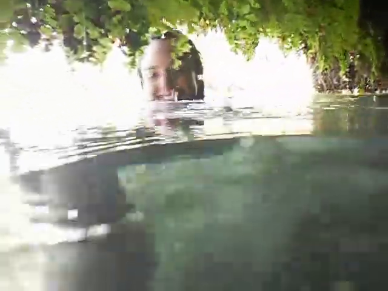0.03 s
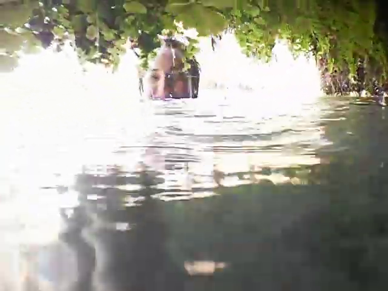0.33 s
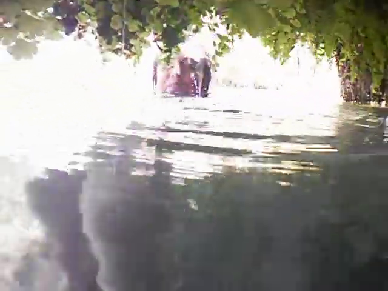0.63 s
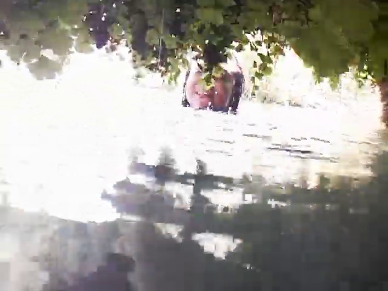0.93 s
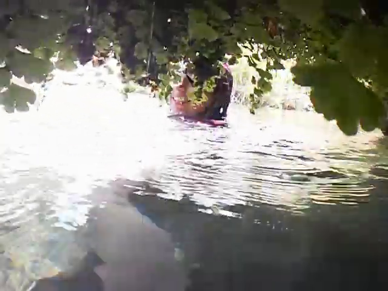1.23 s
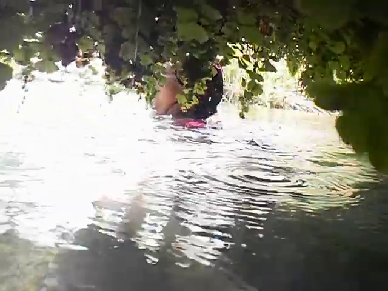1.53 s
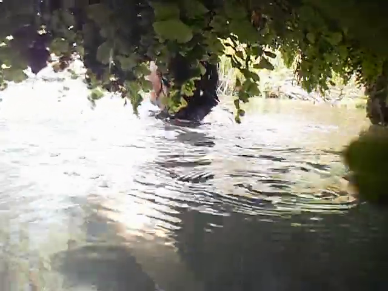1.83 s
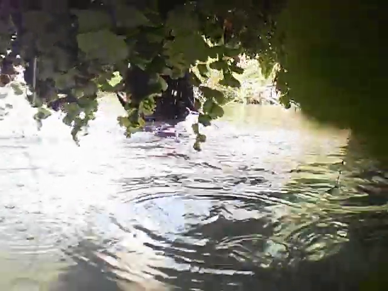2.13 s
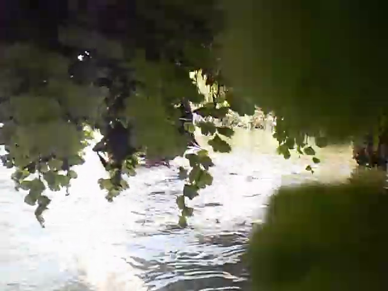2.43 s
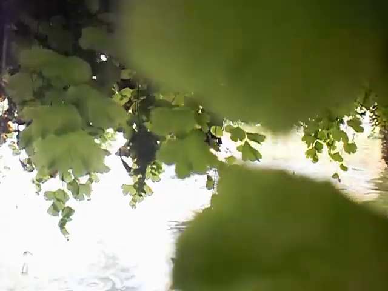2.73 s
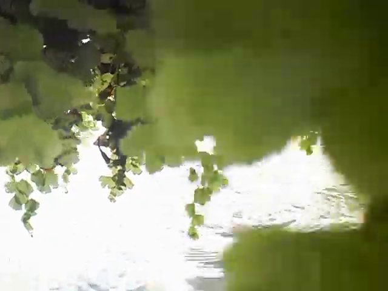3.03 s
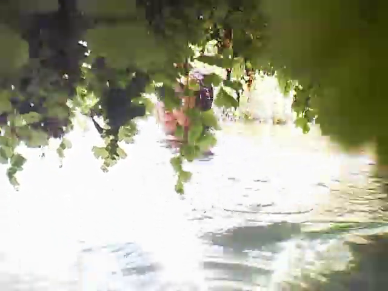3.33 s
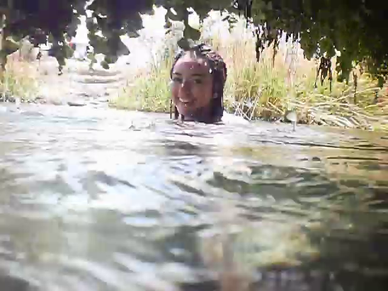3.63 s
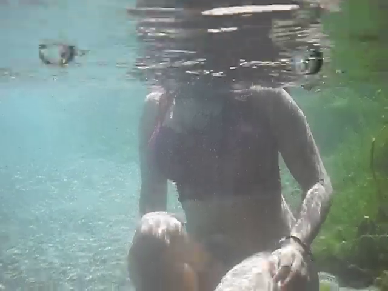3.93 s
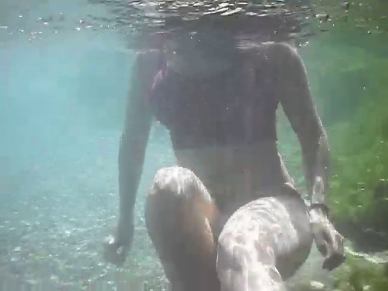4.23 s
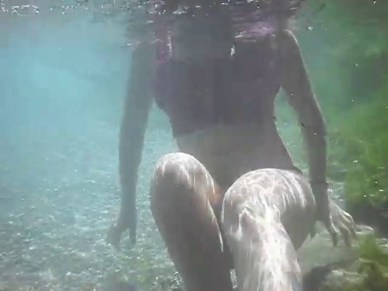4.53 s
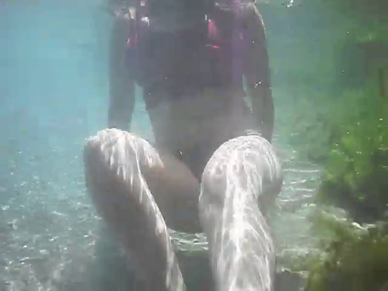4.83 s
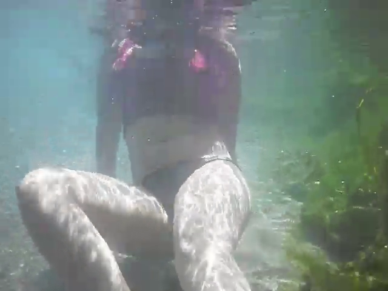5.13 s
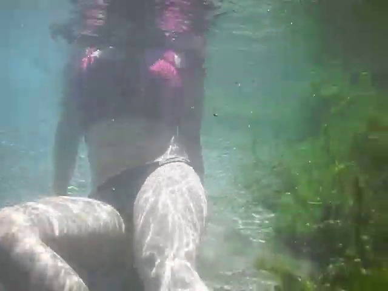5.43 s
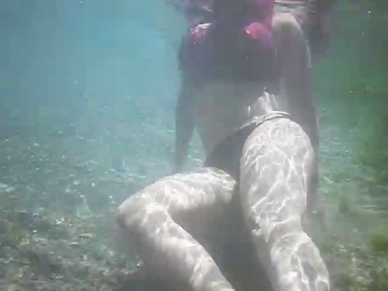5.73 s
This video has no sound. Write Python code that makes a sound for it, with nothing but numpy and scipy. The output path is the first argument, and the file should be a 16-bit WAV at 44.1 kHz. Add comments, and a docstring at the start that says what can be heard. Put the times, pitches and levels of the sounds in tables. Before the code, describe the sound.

A stream rushes softly with faint drips, then water slaps and gulps as the microphone goes under, followed by muffled glugging.

```python
"""A softly rushing stream, heard at water level from a waterproof camera afloat under dripping leaves.
At about 3.6 s the camera is dipped under. Water slaps its case, trapped air breaks away in a few big
gulps, and the rest escapes in a slowing train of glugs, all right beside the microphone.
The sealed case muffles everything and rings faintly."""
import sys
import numpy as np
from scipy.fft import rfft, irfft, next_fast_len
from scipy.io import wavfile
from scipy.ndimage import map_coordinates

SR = 44100
rng = np.random.default_rng(int(sys.argv[2]) if len(sys.argv) > 2 else 0)


def bounce(signal):
    """Save signal as a 16-bit WAV file at the path given by the first command-line argument."""
    frames = np.transpose(np.atleast_2d(signal))
    limited = np.clip(frames, -1, 1)
    pcm = np.round(limited * 32767).astype(np.int16)
    wavfile.write(sys.argv[1], SR, pcm)


N = 254456
TIME = np.arange(N) / SR
AGE = np.arange(SR // 3) / SR  # seconds into one short sound
TOP_HZ = 16500
SUNK_S, PLUNGE_S = 3.82, 3.87  # the case goes under; water closes round it
SUBMERGED = (TIME > SUNK_S).astype(float)


def amp(db):
    """Decibels to gain."""
    return 10 ** (np.asarray(db) / 20)


def unit_rms(x):
    """Scale to rms 1."""
    return x / np.sqrt(np.mean(x ** 2) + 1e-20)


def unit_peak(x):
    """Scale to peak 1."""
    return x / np.max(np.abs(x))


def gain_at(spectrum, hz):
    """Gain at hz, between (freq_hz, level_db) points on a log frequency axis."""
    freq_hz, level_db = np.transpose(spectrum)
    return amp(np.interp(np.log(hz + 1), np.log(freq_hz + 1), level_db))


def wobble(rate):
    """A smooth random curve, rate knots a second."""
    return map_coordinates(rng.standard_normal(int(N * rate / SR) + 4), [TIME * rate])


def filtered(x, response):
    """x through a complex frequency response."""
    size = next_fast_len(len(x) + SR // 4)
    return irfft(rfft(x, size) * response(np.fft.rfftfreq(size, 1 / SR)), size)[:len(x)]


def resonate(x, modes):
    """x through (centre_hz, width_hz, level_db) resonances of alternating sign."""
    def response(f):
        return sum((-1) ** k * amp(db) * 1j * f * width / (centre ** 2 - f ** 2 + 1j * f * width)
                   for k, (centre, width, db) in enumerate(modes))
    return filtered(x, response)


def noise(spectrum, lo=0, hi=TOP_HZ):
    """Coloured noise of rms 1 between two frequencies."""
    white = rng.standard_normal(N)
    return unit_rms(filtered(white, lambda hz: gain_at(spectrum, hz) * (hz >= lo) * (hz < hi)))


def add(track, start_s, sound):
    """Mix a sound into the track."""
    part = track[max(round(start_s * SR), 0):][:len(sound)]
    part += sound[:len(part)]


def fade(t60, attack):
    """A quick swell and an exponential decay, both timed in seconds."""
    return (1 - np.exp(-(AGE / attack) ** 2)) * amp(-60 * AGE / t60)


def ring(hz, t60, attack, rise=0):
    """A dying tone; with rise, its pitch climbs through hz like a bubble rounding off."""
    settle_s = 0.012
    pitch = hz * (1 + rise * (.5 - np.exp(-AGE / settle_s)))
    return unit_peak(fade(t60, attack)) * np.sin(2 * np.pi * np.cumsum(pitch) / SR)


def spit(modes, t60, attack):
    """A short burst of resonant noise, peak 1."""
    return unit_peak(resonate(rng.standard_normal(len(AGE)) * fade(t60, attack), modes))


def drips(centre_hz, spread, t60, size_db, count):
    """Many tiny pings of scattered time, pitch and size, rms 1."""
    out = np.zeros(N)
    age = AGE[:SR // 30]
    shape = fade(t60, attack=0.00025)[:len(age)]
    starts = rng.uniform(0, N / SR, count)
    pitches = centre_hz * np.exp(spread * rng.standard_normal(count))
    sizes = np.minimum(rng.exponential(1, count), 2)
    for start_s, hz, size in zip(starts, pitches, sizes):
        add(out, start_s, amp(size_db * size) * shape * np.sin(2 * np.pi * hz * age))
    return unit_rms(out)


# Body of the stream, from water level: freq_hz, relative_db
RUSH_SPECTRUM = [(12, -31), (20, 7), (27, -8.5), (103, -4.5), (170, -5), (231, -7), (436, -10), (509, -11),
                 (809, -12), (1060, -14.5), (2000, -15.5), (2600, -44), (4400, -120)]
# Its hiss, from the same spot: freq_hz, relative_db
SPRAY_SPECTRUM = [(1800, 3.5), (2300, 3.5), (2700, 0), (3400, 2.5), (3750, 0), (4100, -8.5), (4600, -11)]
def stream():
    """Water rushes evenly all round the floating camera; only its low end swells a little."""
    rumble_db = -49.5 + 0.7 * TIME + .8 * wobble(9)
    rumble = amp(rumble_db) * noise(RUSH_SPECTRUM, hi=250)
    rush = noise(RUSH_SPECTRUM, lo=250, hi=1800)
    spray = noise(SPRAY_SPECTRUM, lo=1800)
    babble_db = -46.2 + 0.22 * wobble(2.3)
    low_pings = amp(-8.5) * drips(700, spread=.4, t60=0.031, size_db=1.5, count=600)
    high_pings = amp(-5.5) * drips(2900, spread=.15, t60=0.0098, size_db=1.5, count=1200)
    babble = amp(babble_db) * unit_rms(rush + low_pings)
    hiss = amp(-48.5) * unit_rms(spray + high_pings)
    return rumble + babble + hiss


# The camera drifts in under dripping leaves: time_s, level_db
TRICKLE_LEVELS = [(.6, -61.5), (1.3, -54), (3.55, -53)]
def trickle():
    """Fine drips from the leaves ring on the water, all near one pitch."""
    level_db = np.interp(TIME, *np.transpose(TRICKLE_LEVELS))
    return amp(level_db) * drips(2330, spread=.03, t60=.03, size_db=3, count=1500)


# The drops that land nearest the microphone: start_s, level_db
NEAR_DROPS = [(1.4413, -34), (2.4144, -36.5), (2.7004, -38.5), (3.2974, -36)]
def drops():
    """Single drops from the leaves ping on the surface, each a short rising tone."""
    out = np.zeros(N)
    for start_s, level_db in NEAR_DROPS:
        pitch_hz = 2340 * (1 + rng.normal(0, 0.012))
        add(out, start_s, amp(level_db) * ring(pitch_hz, t60=0.037, attack=.00048, rise=.024))
    return out


# Bumps directly on the case: start_s, level_db
CASE_BUMPS = [(2.701, -27.5), (3.623, -25.5), (3.69, -20), (3.871, -19), (3.937, -16), (4.046, -22),
              (4.281, -30)]
def thumps():
    """A dull bump on the case dies within a few cycles."""
    out = np.zeros(N)
    for start_s, level_db in CASE_BUMPS:
        add(out, start_s, amp(level_db) * ring(hz=179.4, t60=0.032, attack=0.00046))
    return out


def surge(peak_s, fall_db_per_s):
    """Gain of a push of water that rises quickly and ebbs away."""
    rise_s = 0.022
    since_peak = TIME - peak_s
    return np.clip(1 + since_peak / rise_s, 0, 1) * amp(-fall_db_per_s * np.maximum(since_peak, 0))


# Pushes of water close round the case: peak_s, level_db, fall_db_per_s
WATER_SURGES = [(3.61, -31.5, 172), (3.87, -36, 53), (4.68, -41, 9.5)]
# Resonances of that churning water: centre_hz, width_hz, relative_db
CHURN_MODES = [(169.2, 24, 6.5), (268, 48, 4), (470, 70, 1), (620, 31, -9.5)]
def churn():
    """Water churns round the trapped air with each surge."""
    stir = sum(amp(level_db) * surge(peak_s, fall) for peak_s, level_db, fall in WATER_SURGES)
    flutter = amp(1.7 * wobble(24))
    return stir * flutter * unit_rms(resonate(rng.standard_normal(N), CHURN_MODES))


# Air trapped against the case: pitch_hz, relative_db, t60_s
CAVITY_MODES = [(272.5, -9, 0.094), (502.3, 2.5, 0.047), (767, -3.5, 0.088)]
def cavity():
    """The trapped air rings a little differently at each push."""
    return sum(amp(db + rng.normal(0, 0.73)) * ring(hz * (1 + rng.normal(0, 0.025)), t60, attack=.0008)
               for hz, db, t60 in CAVITY_MODES)


# Air breaking away beside the microphone: start_s, level_db, pitch_hz, t60_s, cavity_relative_db
AIR_POCKETS = [(3.608, -17.5, 337, 0.25, -19), (3.679, -14.5, 801, 0.056, -8),
               (3.69, -22.5, 276, 0.17, -1.5), (3.81, -25, 790, .047, -9), (3.872, -23.5, 735, .08, -8),
               (3.897, -23, 659, 0.09, -13), (3.926, -18.5, 251, 0.081, -12),
               (3.941, -21.5, 597, .055, -16), (4.004, -29, 550, 0.12, -15.5),
               (4.045, -19.5, 552, .05, -14), (4.123, -18.5, 610, 0.079, -18),
               (4.151, -18, 420, 0.046, -14.5), (4.178, -6.5, 475, 0.035, 3.5),
               (4.282, -15.5, 482, 0.022, -7), (4.341, -22.5, 480, 0.086, -16),
               (4.397, -21.5, 734, 0.049, 11.5), (4.889, -17.5, 680, .055, 12.5),
               (5.723, -22, 726, 0.11, -1)]
def gulps():
    """Big pockets of air tear loose and shake the cavity."""
    out = np.zeros(N)
    for start_s, level_db, pitch_hz, t60, cavity_db in AIR_POCKETS:
        pocket = ring(pitch_hz, t60, attack=0.00078, rise=0.04)
        add(out, start_s, amp(level_db) * unit_peak(pocket + amp(cavity_db) * cavity()))
    return out


# Water striking the case, heard from inside: start_s, level_db, pitch_hz
WATER_SLAPS = [(3.6224, -5, 1580), (3.6236, -4, 2205), (3.6574, -18, 3480), (3.6789, -14.5, 2920),
               (3.69, -9, 1520), (3.6927, -15, 3220), (3.8103, -19.5, 1780), (3.849, -21.5, 2250),
               (3.8644, -21, 1470), (3.8715, -5.5, 2382), (3.884, -19.5, 3830), (3.896, -11, 3695),
               (3.9111, -17, 3740), (3.9202, -27, 2480), (4.0035, -18, 2490), (4.0087, -18, 2620),
               (4.032, -22.5, 2740), (4.0443, -16.5, 1590), (4.0866, -20, 1870), (4.121, -6, 1794),
               (4.2805, -28, 1300), (4.3312, -24, 1743), (4.3385, -24.5, 1340), (4.3439, -25, 3620)]
# Colour of the splatter on its wall: centre_hz, width_hz, relative_db
SPLATTER_MODES = [(1950, 3200, 2), (3220, 1100, 7), (3830, 550, 4), (4360, 550, -4)]
# Ring of the case round the microphone: pitch_hz, relative_db, t60_s
CASE_MODES = [(700, -10.5, 0.037), (1640, 0.5, 0.033), (1737, -4.5, 0.011), (2285, -1.5, 0.037)]
def slaps():
    """Each slap rings a tiny bubble, splatters, and knocks the case; weak slaps are mostly splatter."""
    out = np.zeros(N)
    main_mode_hz = CASE_MODES[1][0]
    for start_s, level_db, pitch_hz in WATER_SLAPS:
        ping = ring(pitch_hz, t60=.014, attack=0.001, rise=0.016)
        splatter = amp(-7.5 - .38 * level_db) * spit(SPLATTER_MODES, t60=0.018, attack=0.00045)
        case = sum(amp(db) * ring(hz * (1 + rng.normal(0, 0.0035)), t60, attack=0.00047)
                   for hz, db, t60 in CASE_MODES)
        octaves_off = abs(np.log2(pitch_hz / main_mode_hz))
        knock = amp(-2.5 - 11.5 * octaves_off) * unit_peak(case)  # strongest near the main mode
        add(out, start_s, amp(level_db) * unit_peak(ping + splatter + knock))
    return out


# The stream with the microphone below the surface: freq_hz, relative_db
HUSH_SPECTRUM = [(12, -48), (20, -2.5), (113, -7), (162, -3.5), (216, -13.5), (270, -4), (403, -9.5),
                 (563, -11), (644, -7), (840, -17), (1150, -15), (3570, -22.5), (4080, -26.5), (5300, -71),
                 (8980, -120)]
def underwater():
    """A dull steady hush over slow swells of pressure."""
    swell_spectrum = [(8, -3.5), (25, -7), (70, -35), (300, -81.5)]
    swell = amp(-47 + 1.6 * wobble(5.2)) * noise(swell_spectrum)
    return amp(-41.5) * noise(HUSH_SPECTRUM) + swell


def crackle():
    """Tiny bubbles burst on the case from the plunge until the glugging starts."""
    gate = surge(PLUNGE_S, fall_db_per_s=22) * (TIME < GLUG_TRAIN[0][0])
    return amp(-46) * gate * drips(3000, spread=.25, t60=.009, size_db=8, count=900)


# A large air pocket close by: start_s, length_s, level_db, pitch_hz
POCKET_THROBS = [(3.88, .12, -35, 173), (4.047, .25, -36.5, 187), (5.71, .1, -33.5, 163)]
def throbs():
    """A large pocket of air hums low and unsteadily while the water stirs it."""
    out = np.zeros(N)
    edge_s = 0.029
    for start_s, length_s, level_db, pitch_hz in POCKET_THROBS:
        held = np.clip(np.minimum(TIME - start_s, start_s + length_s - TIME) / edge_s, 0, 1)
        gain = held * amp(level_db + wobble(30))
        wavering_hz = pitch_hz * (1 + 0.022 * wobble(40))
        out += gain * np.sin(2 * np.pi * np.cumsum(wavering_hz) / SR)
    return out


# Small bubbles near the sunken case: start_s, level_db, pitch_hz
STRAY_BUBBLES = [(3.953, -31.5, 1125), (4.2935, -23, 1760), (4.35, -26, 900), (4.554, -33, 1740),
                 (4.721, -23, 1067), (4.76, -27.5, 1595), (4.826, -24, 1010), (4.935, -35.5, 1560),
                 (4.965, -33, 930), (5.072, -29.5, 1175)]
def blips():
    """Small bubbles ping beside the big ones, each a short rising tone."""
    out = np.zeros(N)
    for start_s, level_db, pitch_hz in STRAY_BUBBLES:
        add(out, start_s, amp(level_db) * ring(pitch_hz, t60=.034, attack=0.00037, rise=.055))
    return out


# Air leaving the case bubble by bubble, right at the microphone: start_s, level_db
GLUG_TRAIN = [(4.438, -31.5), (4.477, -28), (4.513, -28), (4.546, -21.5), (4.587, -24.5), (4.631, -30),
              (4.662, -30), (4.72, -22), (4.763, -24.5), (4.785, -18.5), (4.826, -20.5), (4.847, -21.5),
              (4.937, -29), (4.967, -25), (4.999, -29.5), (5.045, -28), (5.074, -22.5), (5.116, -21.5),
              (5.166, -22.5), (5.223, -23), (5.289, -22.5), (5.337, -21.5), (5.388, -22), (5.46, -23.5),
              (5.505, -21.5), (5.571, -23), (5.643, -25.5)]
def glugs():
    """Each escaping bubble pinches off with a soft tick, chirps upward and rings the cavity."""
    out = np.zeros(N)
    base_hz, climb_hz_per_s, sag_hz_per_db = 613.7, 41, 1.5
    burst_s, burst_length_s, burst_sag_hz = 5.1, .2, 34  # a fresh burst of air: bigger, lower bubbles
    tick_modes = [(1010, 310, 3), (1690, 220, -0.5)]
    first_s = GLUG_TRAIN[0][0]
    usual_db = np.mean([level_db for _, level_db in GLUG_TRAIN])
    for start_s, level_db in GLUG_TRAIN:
        since_burst = start_s - burst_s
        pitch_hz = base_hz + climb_hz_per_s * (start_s - first_s)  # climbs as the air runs out
        pitch_hz -= sag_hz_per_db * (level_db - usual_db)  # big bubbles are lower
        pitch_hz -= burst_sag_hz * (0 < since_burst < burst_length_s)
        chirp = ring(pitch_hz, t60=0.077 * np.exp(rng.normal(0, .15)), attack=0.0014, rise=0.19)
        recoil = amp(-14) * ring(272, t60=0.12, attack=0.0011, rise=0.036)  # air left behind springs back
        tick_gain = amp(-43) + (since_burst > 0) * amp(-31 - 46 * since_burst)  # louder in the burst
        tick = tick_gain * spit(tick_modes, t60=0.016, attack=0.00038)
        nudge = amp(-33 - level_db) * cavity()  # ends up about equally loud in every glug
        add(out, start_s, amp(level_db) * unit_peak(chirp + nudge + recoil) + tick)
    return out


def scene():
    """The stream above, the plunge, and the bubbling below; the surface cuts out as the case sinks."""
    above = (1 - SUBMERGED) * (stream() + trickle()) + drops()
    plunge = thumps() + churn() + gulps() + slaps() + crackle() + throbs()
    below = SUBMERGED * underwater() + blips() + glugs()
    return (above + plunge + below)[None]


# Response of the microphone inside the sealed case: freq_hz, gain_db
MIC_RESPONSE = [(20, 0.5), (3750, 1), (3950, -7), (4300, -5), (4600, -35), (5000, -66.5)]
def record(dry):
    """One narrow-band microphone behind the sealed case; the hardest slap clips the recorder."""
    cutoff_hz, clip_level = 4550, .714
    treble = [(4300, 0), (5000, -6), (10000, -1), (14000, -8.5)]  # freq_hz, gain_db
    muffled = filtered(dry[0], lambda hz: gain_at(MIC_RESPONSE, hz) / np.sqrt(1 + (hz / cutoff_hz) ** 40))
    clipped = np.clip(muffled, -clip_level, clip_level)
    return filtered(clipped, lambda hz: gain_at(treble, hz) * (hz < TOP_HZ))[None]


dry = scene()
out = record(dry)
bounce(out)
```